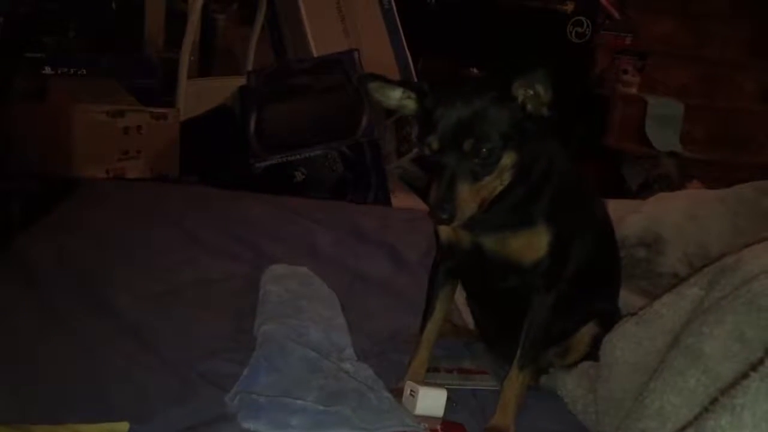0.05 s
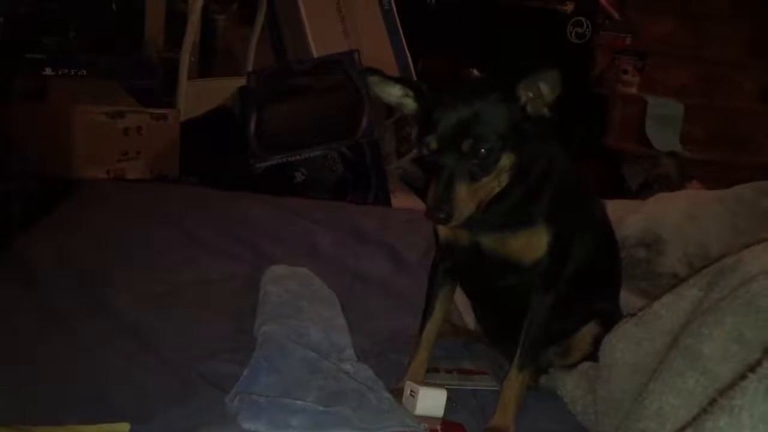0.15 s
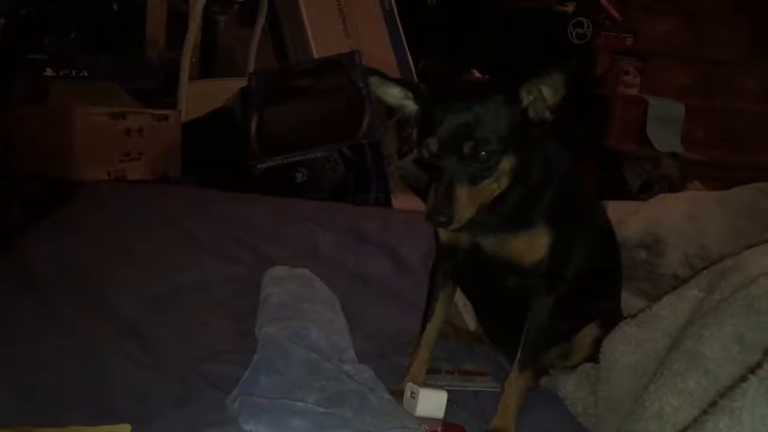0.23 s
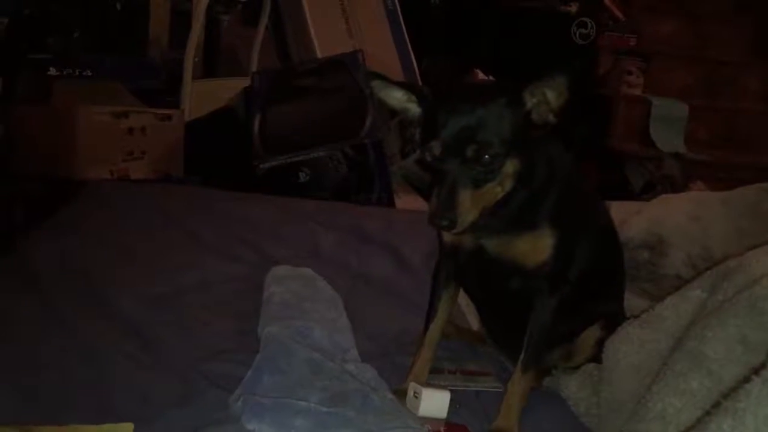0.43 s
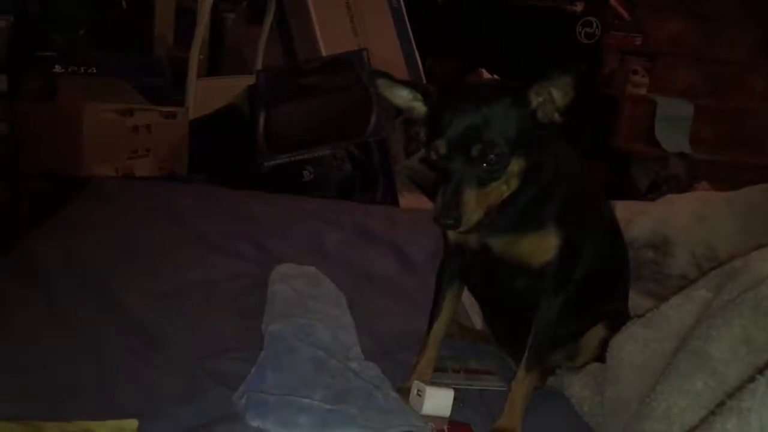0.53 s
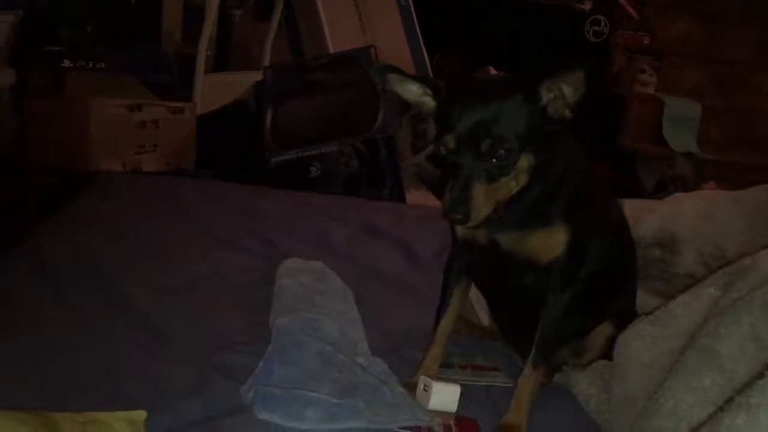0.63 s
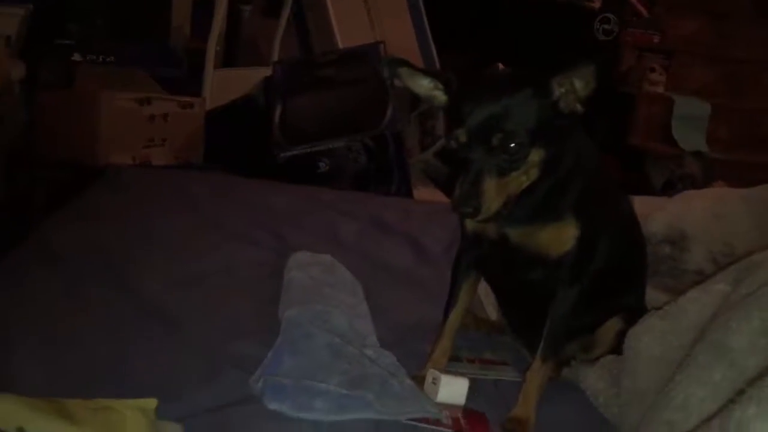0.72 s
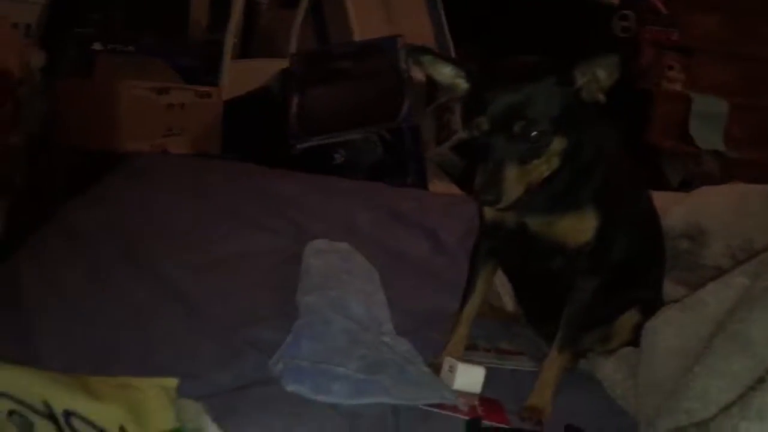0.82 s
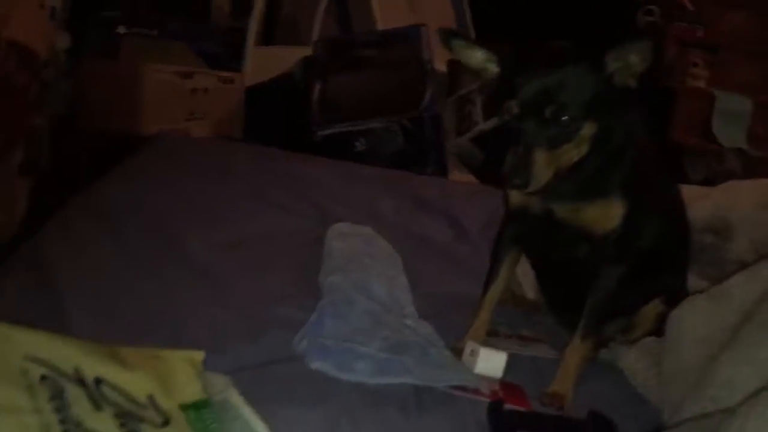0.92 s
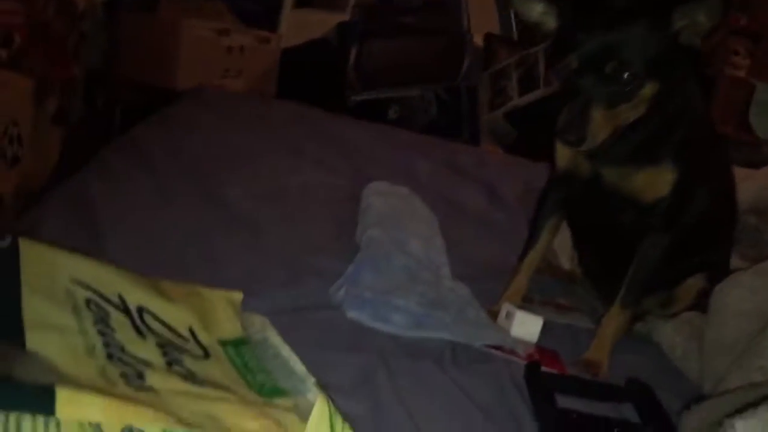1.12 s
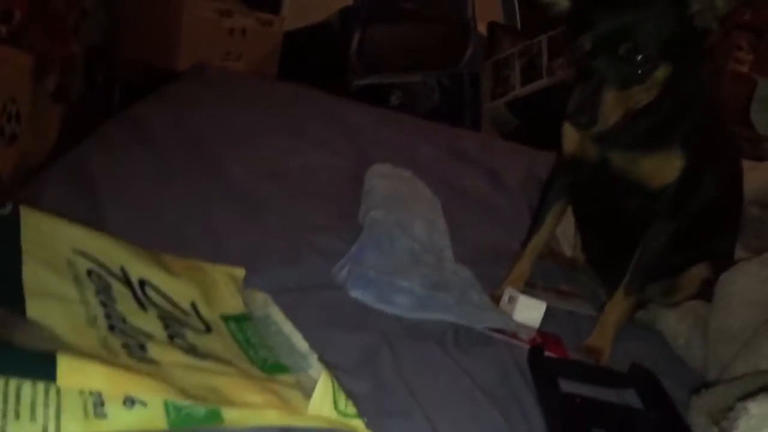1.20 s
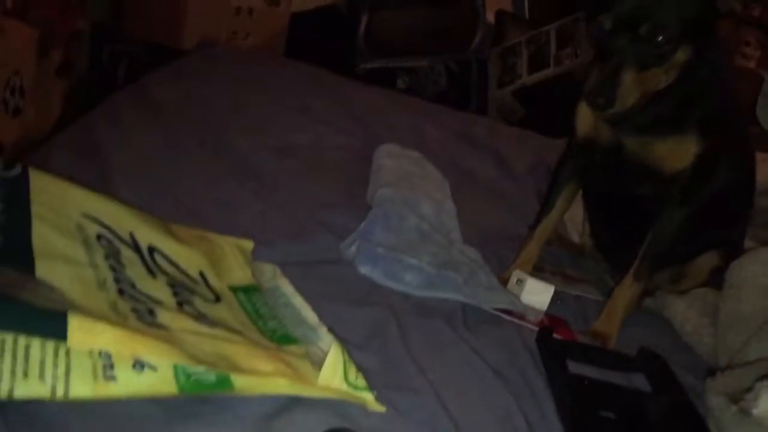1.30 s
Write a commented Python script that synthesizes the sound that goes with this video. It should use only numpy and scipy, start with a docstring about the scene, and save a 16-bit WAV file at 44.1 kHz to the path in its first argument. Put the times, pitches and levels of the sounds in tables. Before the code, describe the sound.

A small dog gives one short throaty grunt that breaks upward into a quavering whine. Then a plastic treat bag rustles faintly with a tiny tick. A fan hums low in the quiet, softly furnished room.

```python
"""A small dog on a bed gives one short throaty grunt: a low creak of the vocal folds that breaks
upward into a quavering, nearly pure whine. Air rasps through its nose once a cycle, and a thin
nasal whistle opens and closes the grunt. Later a plastic treat bag is lifted with a faint rustle
and one tick. The soft, cluttered room answers briefly and a fan hums in it."""
import sys
import numpy as np
from scipy import signal
from scipy.fft import rfft, irfft
from scipy.io import wavfile
from scipy.ndimage import uniform_filter1d

SR = 44100
rng = np.random.default_rng(int(sys.argv[2]) if len(sys.argv) > 2 else 0)


def file_out(sig):
    """Save sig as 16-bit WAV at sys.argv[1]."""
    # one column per channel
    cols = np.atleast_2d(sig).T
    # limit, then scale
    lim = np.clip(cols, -1, 1)
    pcm = np.round(lim * 32767).astype(np.int16)
    wavfile.write(sys.argv[1], SR, pcm)


N = 59535


def undb(db):
    """Decibels to gain."""
    return 10 ** (np.asarray(db) / 20)


def unit(x):
    """Scale to rms 1."""
    return x / np.sqrt(np.mean(x ** 2))


def response(hz, curve):
    """Gain of an (f/Hz, level/dB) curve at hz."""
    curve_hz, curve_db = np.array(curve).T
    return undb(np.interp(np.log(hz + 1e-9), np.log(curve_hz), curve_db))


def colour(x, curve):
    """Filter by an (f/Hz, level/dB) curve; rms 1."""
    bins_hz = np.arange(N // 2 + 1) * SR / N
    return unit(irfft(rfft(x) * response(bins_hz, curve), N))


def ring(x, hz, width_hz):
    """One resonance applied twice; rms 1."""
    b, a = signal.iirpeak(hz, hz / width_hz, fs=SR)
    return unit(signal.lfilter(b, a, signal.lfilter(b, a, x)))


def drift(rate_hz):
    """Smooth noise changing at about rate_hz; rms 1."""
    span = int(SR / rate_hz)
    smoothed = uniform_filter1d(rng.standard_normal(N), span, mode="wrap")
    return unit(uniform_filter1d(smoothed, span, mode="wrap"))


def swell(t, centre_s, sigma_s, peak_db):
    """Gaussian envelope."""
    return undb(peak_db) * np.exp(-.5 * ((t - centre_s) / sigma_s) ** 2)


# Air noise spectrum: f/Hz, relative level/dB
AIR_SPECTRUM = [(20, -40), (35, -27), (55, -12.5), (85, -1), (120, 0.5), (160, 0), (195, -11.5), (280, -18),
                (400, -30.5), (800, -27.5), (1300, -23), (2200, -25), (3200, -32), (4800, -39.5),
                (7500, -43.5), (11000, -47), (15500, -47.5)]
# Fan and mains hum: f/Hz, rms level/dB
HUM_LINES = [(69.3, -70.5), (119.5, -58.5), (208, -72), (239.5, -75), (346, -80.5), (415, -86),
             (485, -82.5), (554, -88), (622, -86), (692, -82.5)]

def fan(t, air_db=-52, waver_db=2.5):
    """Low rumble and soft hiss of air, with faint wavering hum lines."""
    hum = np.zeros(N)
    for hz, db in HUM_LINES:
        amplitude = np.sqrt(2) * undb(db + waver_db * drift(rate_hz=5.5))
        hum += amplitude * np.sin(2 * np.pi * (hz * t + rng.random()))
    return hum + undb(air_db) * colour(rng.standard_normal(N), AIR_SPECTRUM)


def room(x, wall_delay_s=.0115, wall_cut_hz=680, wall_db=-12, gap_s=.004, t60_s=.2, tail_db=-18):
    """A bare wall returns mainly overtones; bedding and boxes scatter a short echo."""
    delayed = np.interp(np.arange(N) - wall_delay_s * SR, np.arange(N), x, left=0)
    wall = signal.sosfilt(signal.butter(2, wall_cut_hz, "highpass", fs=SR, output="sos"), delayed)
    t = np.arange(SR // 2) / SR
    tail = rng.standard_normal(len(t)) * (t > gap_s) * undb(-60 * t / t60_s)
    scatter = signal.fftconvolve(x, tail / np.linalg.norm(tail))[:N]
    return x + undb(wall_db) * wall + undb(tail_db) * scatter


# Bag rustles: t/s, sigma/s, level/dB, f/Hz, bandwidth/Hz
BAG_RUSTLES = [(.98, 0.025, -76, 14000, 5300), (0.977, 0.023, -76, 9000, 1900),
               (1.21, .15, -81.5, 9550, 1100), (1.3, 0.26, -87, 13000, 5200), (0.83, 0.16, -70, 1570, 2300)]

def bag(t, crinkles_per_s=18000, tick_s=1.029, tick_decay_s=.0023, tick_db=-64):
    """Dense tiny crinkles swell and fade as the plastic moves; one crease ticks."""
    rustle = np.zeros(N)
    for centre_s, sigma_s, db, hz, width_hz in BAG_RUSTLES:
        crinkles = (rng.random(N) < crinkles_per_s / SR) * rng.standard_normal(N)
        rustle += swell(t, centre_s, sigma_s, db) * ring(crinkles, hz, width_hz)
    snap = (t > tick_s) * np.exp(-np.abs(t - tick_s) / tick_decay_s)
    tick = snap * ring(rng.standard_normal(N), hz=9400, width_hz=1900)
    return rustle + undb(tick_db) * tick


# Nostril whistles: t/s, sigma/s, level/dB, f/Hz
NOSTRIL_WHISTLES = [(.213, 0.0031, -66, 3190), (.24, 0.025, -62, 3340), (.396, 0.0022, -52, 3280)]

def whistle(t, width_hz=310):
    """Air sings briefly in the dog's narrow nostrils."""
    return sum(swell(t, centre_s, sigma_s, db) * ring(rng.standard_normal(N), hz, width_hz)
               for centre_s, sigma_s, db, hz in NOSTRIL_WHISTLES)


# Upper nasal resonances: f/Hz, relative level/dB
NOSE_RESPONSE = [(1200, -30), (2100, -7.5), (2700, -31), (3650, -4), (4000, -3.5), (4300, -4), (4700, -7.5),
                 (5960, -5), (6700, -5.5), (7600, -31), (8100, -22), (8620, 1.5), (9100, -12),
                 (10200, -27.5), (11000, -14.5), (12000, -29), (14200, -25), (15400, -18)]
# Nasal buzz: harmonic number, relative level/dB
BUZZ_HARMONICS = [(6, -5), (7, -4), (10, -7), (11, -13), (14, -13)]

def nose(phase, opening, creak, rasp_gain_db=-4):
    """Air rasps through the nose once a cycle; harmonics buzz in it during the whine."""
    rasp = colour(opening * rng.standard_normal(N), NOSE_RESPONSE)
    buzz = np.sqrt(2) * sum(undb(db) * np.sin(order * phase) for order, db in BUZZ_HARMONICS)
    return undb(rasp_gain_db) * rasp + (1 - creak) * buzz


# Throat resonances: f/Hz, gain/dB
THROAT_RESPONSE = [(400, 7), (610, -1), (700, 2), (820, -22), (1070, -2.5), (1220, -8.5), (1500, -9.5),
                   (1650, -23), (1850, -28.5), (2400, -42)]

def throat(phase, hz, opening):
    """The throat shapes harmonics 2-9 and pulsed breath; returns (overtones, breath)."""
    orders = np.arange(2, 10)[:, None]
    top_hz = THROAT_RESPONSE[-1][0]
    gains = response(orders * hz, THROAT_RESPONSE) * (orders * hz < top_hz)
    overtones = np.sqrt(2) * (gains * np.sin(orders * phase)).sum(0)
    breath = colour(opening * rng.standard_normal(N), THROAT_RESPONSE)
    return overtones, breath


# Voice pitch: t/s, f/Hz
VOICE_PITCH = [(.204, 255), (.216, 264.4), (.229, 336.1), (.238, 528), (.243, 502.6), (.249, 372),
               (.257, 394), (.264, 633.7), (.271, 593.4), (.28, 535.2), (.29, 606.5), (.301, 612),
               (.312, 540.6), (.324, 593), (.337, 613.4), (.35, 539), (.362, 603.7), (.388, 607.6),
               (.399, 697), (.41, 662.6)]
# Voice levels: t/s, fundamental level/dB, throat drive/dB, nose drive/dB
VOICE_LEVELS = [(.207, -38, -38.5, -61), (.216, -41, -43, -60), (.227, -36.5, -38, -59),
                (.239, -32.5, -33.5, -58), (.249, -38, -40, -59), (.259, -38, -39, -58),
                (.265, -27, -30, -51), (.281, -32.5, -29.5, -52), (.291, -28, -28.5, -50),
                (.305, -28, -28.5, -51), (.315, -33.5, -30, -54), (.332, -28.5, -29.5, -53.5),
                (.351, -35, -32, -59), (.364, -29.5, -30.5, -53), (.389, -30, -31.5, -57),
                (.399, -37, -39, -64), (.408, -36.5, -44, -80)]

def dog(t, start_s=.204, break_s=.262, end_s=.408):
    """Vocal folds creak unevenly, then break into a clean whine, driving throat and nose."""
    attack_s, crossfade_s, release_s = .001, .015, .007
    times_s, *levels_db = np.array(VOICE_LEVELS).T
    fundamental_rms, throat_drive, nose_drive = (undb(np.interp(t, times_s, db)) for db in levels_db)
    creak = np.clip((break_s - t) / crossfade_s + .5, 0, 1)  # 1 = creak, 0 = whine
    jitter = (.004 + .02 * creak) * drift(rate_hz=450)
    shimmer_db = (.94 + 1.1 * creak) * drift(rate_hz=233)
    hz = np.interp(t, *np.array(VOICE_PITCH).T) * (1 + jitter)
    phase = 2 * np.pi * np.cumsum(hz) / SR
    opening = .5 + .5 * np.cos(phase)  # folds: 0 = shut, 1 = open
    overtones, breath = throat(phase, hz, opening)
    tone = fundamental_rms * np.sqrt(2) * np.sin(phase) + throat_drive * overtones
    creak_air = undb(-17) * creak * throat_drive * breath
    nasal = nose_drive * nose(phase, opening, creak)
    gate = np.clip((t - start_s) / attack_s, 0, 1) * np.exp(-np.maximum(t - end_s, 0) / release_s)
    return gate * (tone * undb(shimmer_db) + creak_air + nasal)


def scene():
    """Dog and bag in the humming room; mono."""
    t = np.arange(N) / SR
    return (room(dog(t) + whistle(t) + bag(t)) + fan(t))[None]


def record(dry, cutoff_hz=15700):
    """Steep low-pass on the top treble."""
    return signal.sosfilt(signal.ellip(10, .2, 70, cutoff_hz, fs=SR, output="sos"), dry)


dry = scene()
out = record(dry)
file_out(out)
```